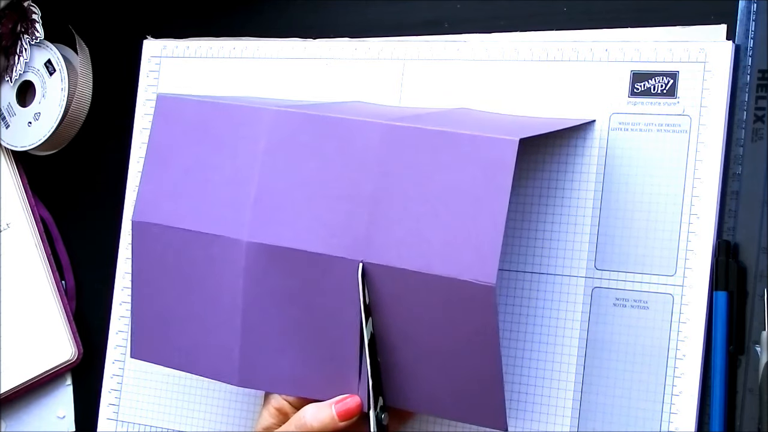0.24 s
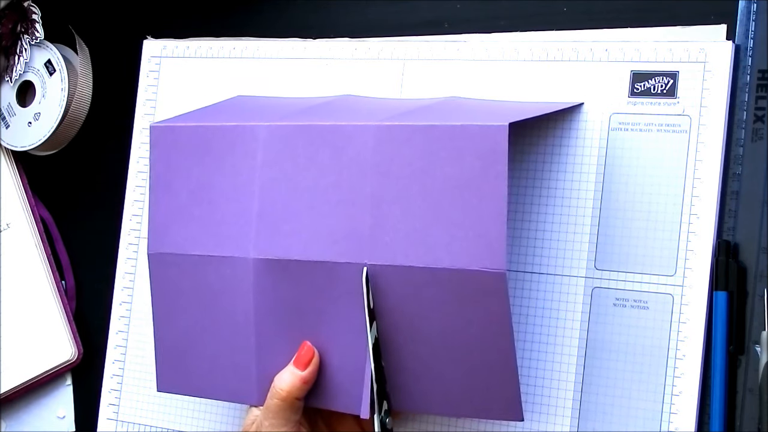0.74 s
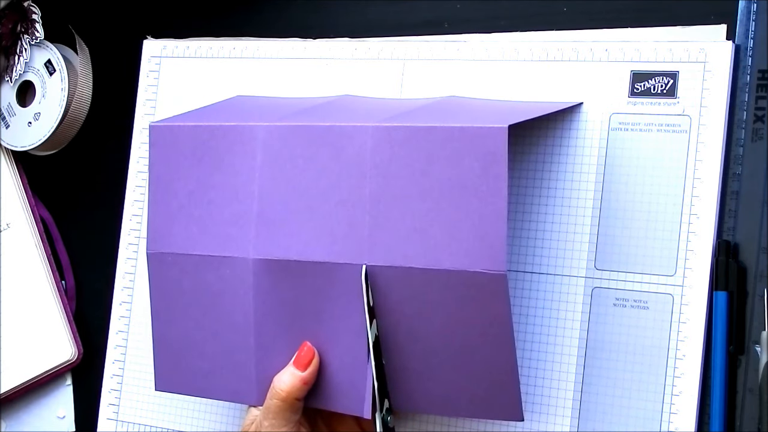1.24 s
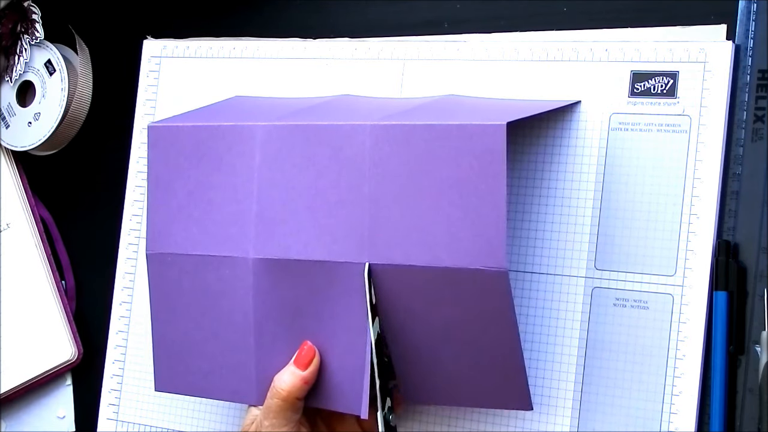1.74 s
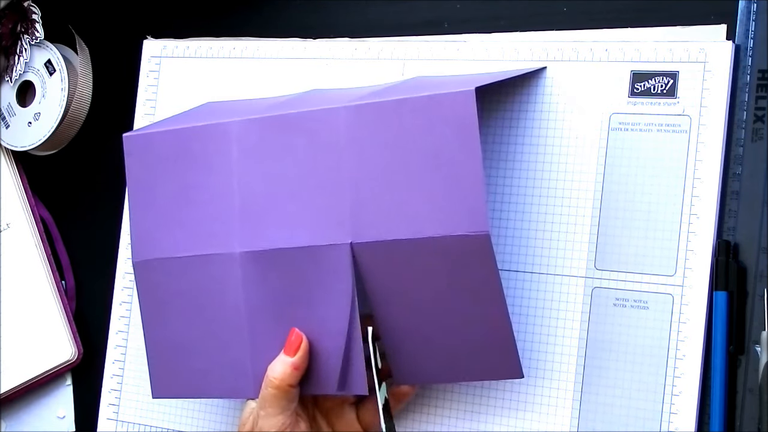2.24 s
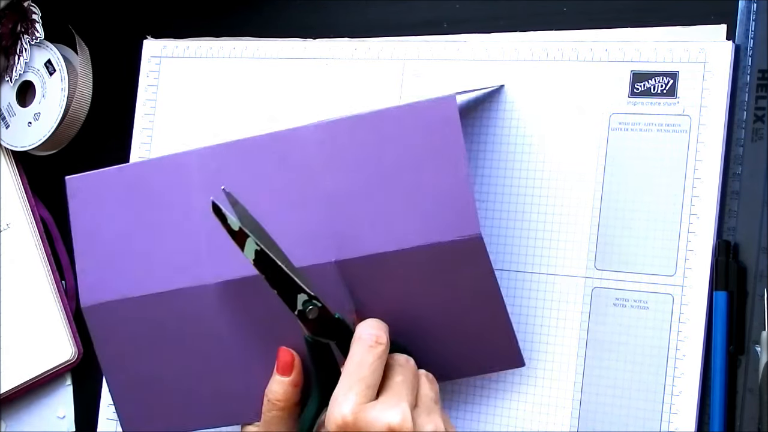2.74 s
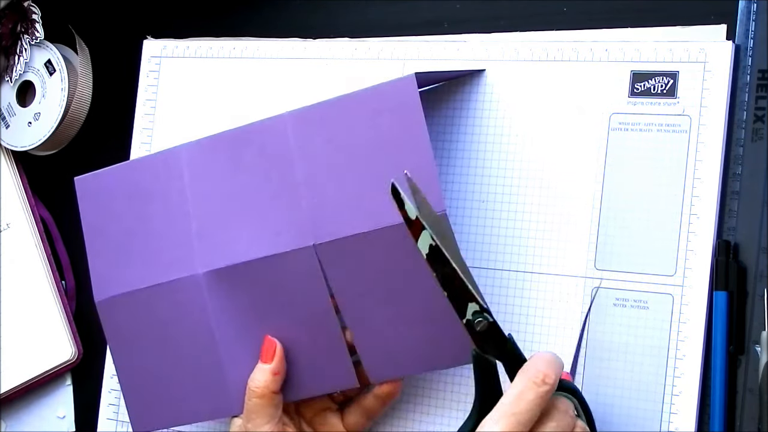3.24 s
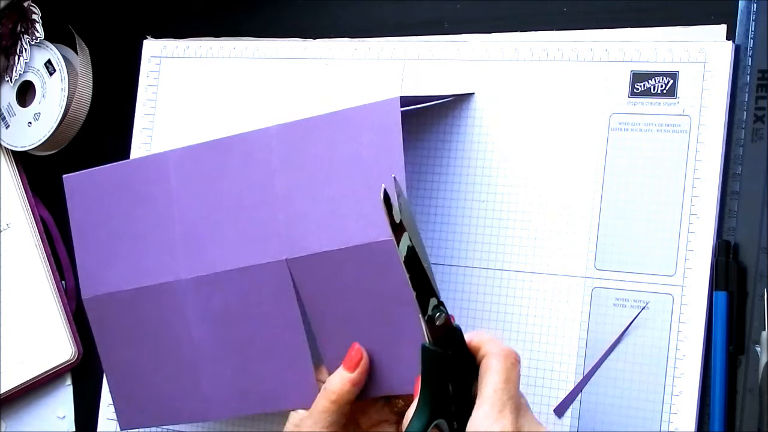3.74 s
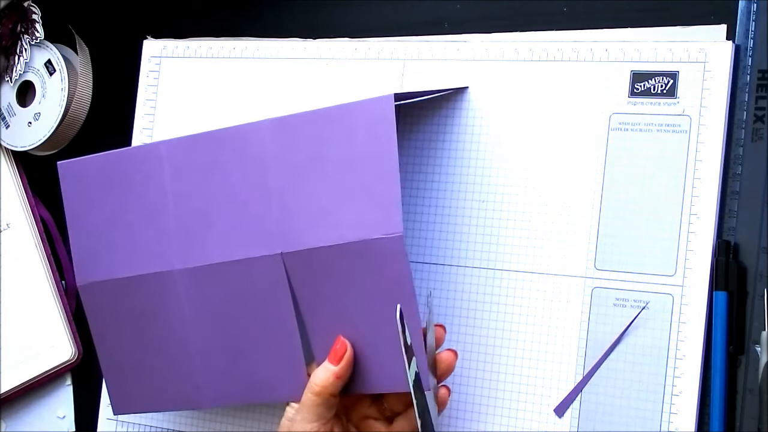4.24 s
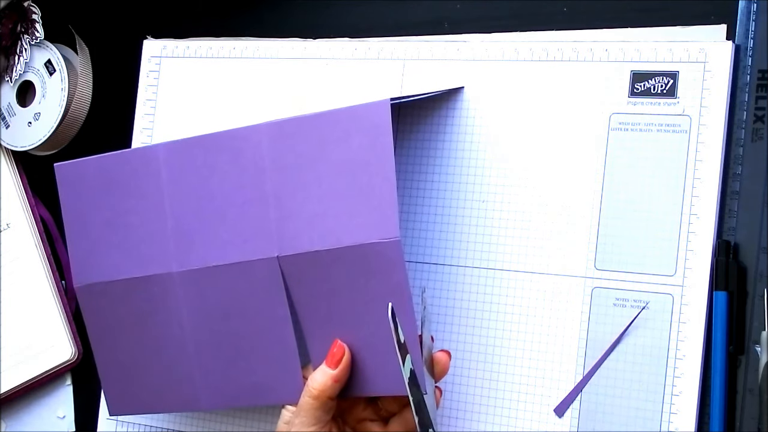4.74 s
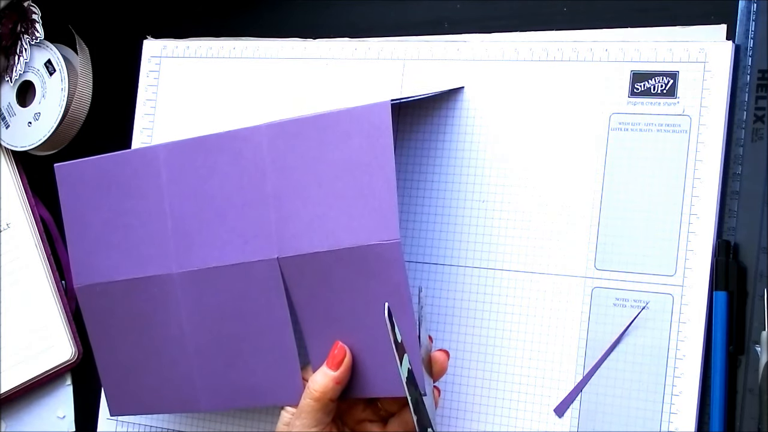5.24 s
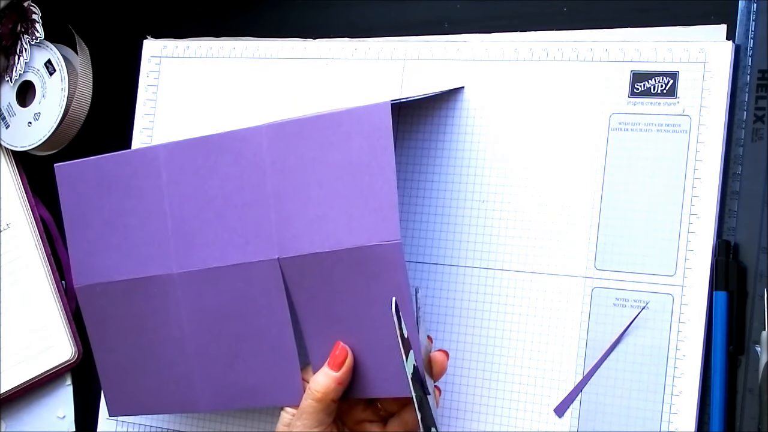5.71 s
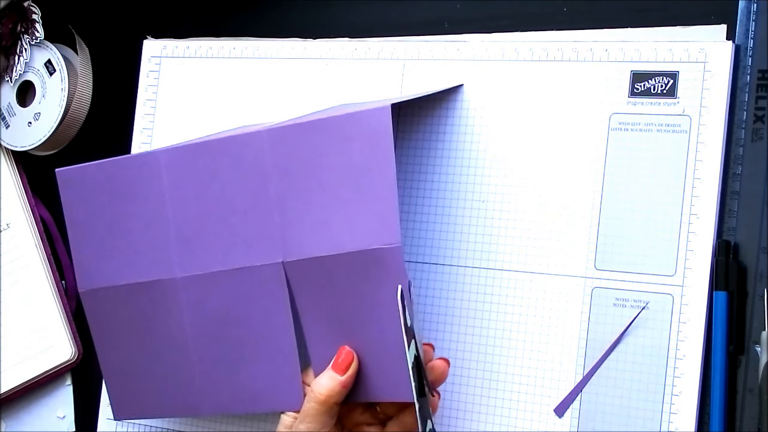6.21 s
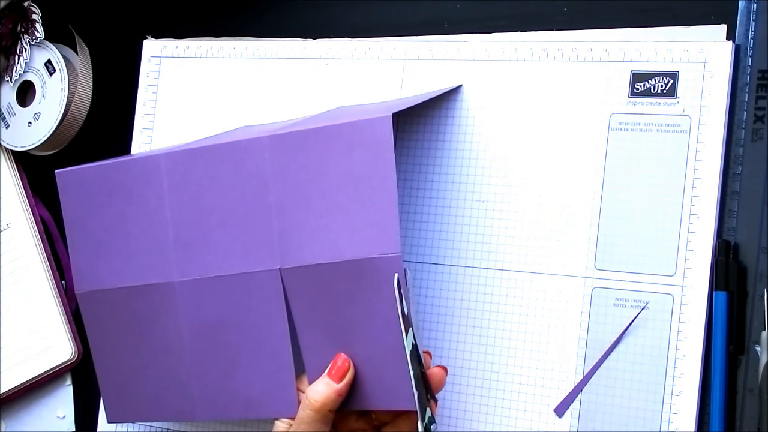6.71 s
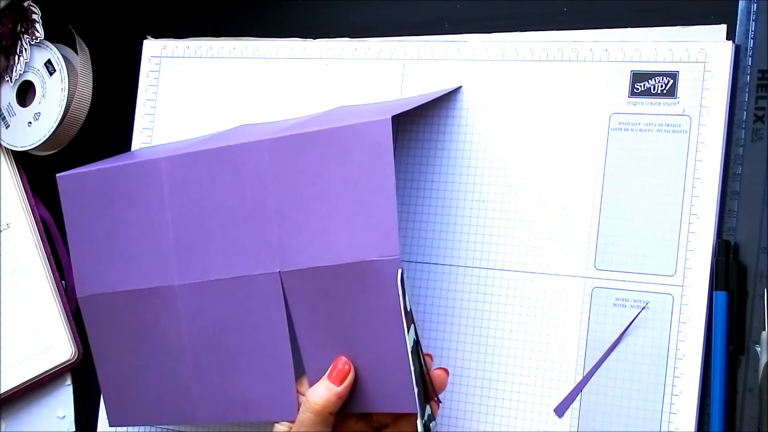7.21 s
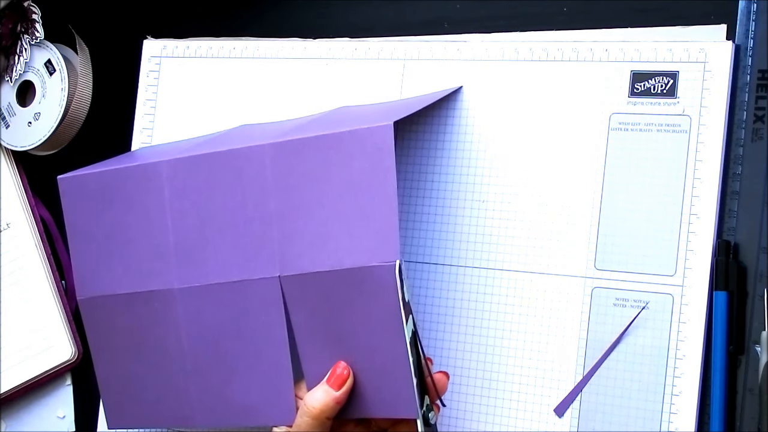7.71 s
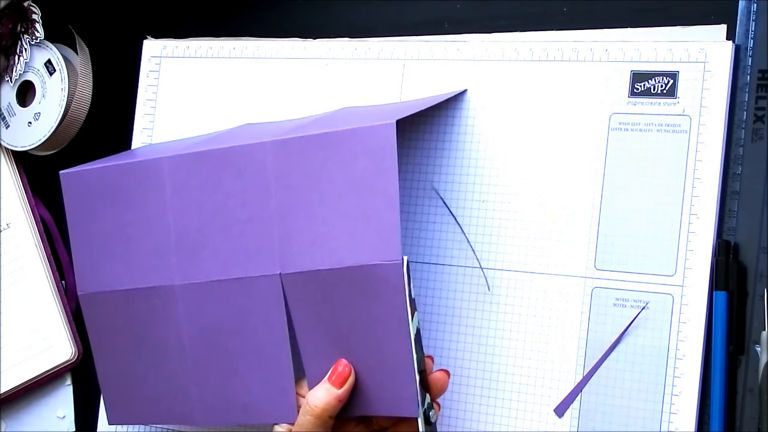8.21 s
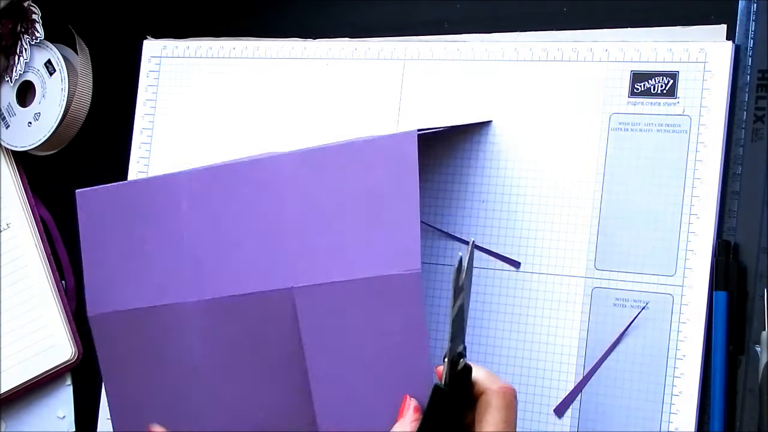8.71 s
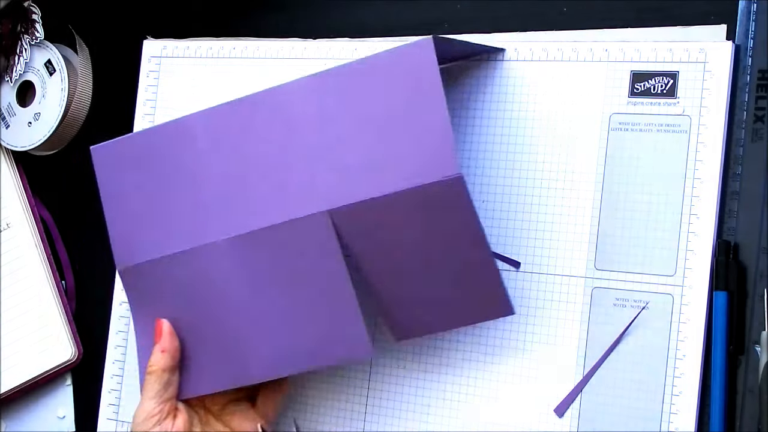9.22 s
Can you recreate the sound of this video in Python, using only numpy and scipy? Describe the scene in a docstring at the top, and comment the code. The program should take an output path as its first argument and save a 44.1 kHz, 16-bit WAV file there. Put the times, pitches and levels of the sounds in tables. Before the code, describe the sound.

Scissors cut a folded sheet of card, close to the microphone in a small quiet room. Soft handling leads into a run of crunchy cuts ending in a sharp snap. The card then scrapes, rustles and clicks as it is moved. After a brief lull come slower, softer cuts, another sharp snap of the blades, and a last stretch of rustling and tapping over faint hiss.

```python
"""Scissors cut a folded sheet of card above a craft table in a small quiet room.
Fibres tear in bursts of crackle, the blade tips snap shut, and the card scrapes by stick-slip.
Each break sounds the cut edge, a loose flap, the steel and the low, booming modes of the sheet.
The room answers with a short tail over faint air noise; a two-port microphone adds its hiss."""
import sys
import numpy as np
from scipy import signal
from scipy.fft import rfft, irfft, next_fast_len
from scipy.io import wavfile
from scipy.ndimage import uniform_filter1d

SR = 44100
rng = np.random.default_rng(int(sys.argv[2]) if len(sys.argv) > 2 else 0)


def pcm_store(signal):
    """Save signal as 16-bit PCM."""
    levels = np.round(np.clip(np.atleast_2d(signal), -1, 1) * 32767)
    wavfile.write(sys.argv[1], SR, levels.astype(np.int16).T)


N = 417186


def undb(db):
    """Gain of a dB value."""
    return 10 ** (np.asarray(db) / 20)


def unit(x):
    """Scale to rms 1."""
    return x / np.sqrt(np.mean(x ** 2))


def colour(x, points):
    """Minimum-phase EQ along a (Hz, dB) curve, with unit power gain."""
    size = 4096
    hz, db = np.transpose(points)
    curve_db = np.interp(np.log(np.arange(size // 2 + 1) * SR / size + 1), np.log(hz), db)
    cepstrum = irfft(curve_db * np.log(10) / 20)
    cepstrum[1:size // 2] *= 2
    cepstrum[size // 2 + 1:] = 0
    impulse = irfft(np.exp(rfft(cepstrum)))[:size // 2]
    return signal.fftconvolve(x, impulse / np.sqrt(np.sum(impulse ** 2)))[:len(x)]


def drift(rate_hz):
    """Random modulator: sample and hold, slewed twice, rms 1."""
    hold = int(SR / rate_hz)
    steps = np.repeat(rng.standard_normal(N // hold + 1), hold)
    return unit(uniform_filter1d(uniform_filter1d(steps, hold), hold)[:N])


def air():
    """Room tone: faint air noise whose level wanders slightly."""
    # air noise spectrum (frequency [Hz], relative level [dB])
    air_eq = [(60, -17), (100, -4.5), (190, -4.5), (290, -3), (480, -2), (570, 0.5), (820, 4.5),
              (1000, -15), (1500, -4), (2800, -10.5), (3600, -10), (5500, -24.5), (9000, -32)]
    return colour(rng.standard_normal(N), air_eq) * undb(-61 + drift(2.5))


def room(x):
    """Small-room reverb: a noise tail that builds over a few ms and fades octave by octave."""
    # room decay (frequency [Hz], time to fall 60 dB [s])
    decay = [(250, 0.17), (700, 0.23), (2000, 0.27), (4000, 0.24), (9000, 0.22)]
    hz, t60 = np.transpose(decay)
    t = np.arange(SR // 2) / SR
    tail = 0
    for centre in 180 * 2 ** np.arange(7):
        octave = [centre / np.sqrt(2), min(centre * np.sqrt(2), .45 * SR)]
        bandpass = signal.butter(2, octave, "band", fs=SR, output="sos")
        band_t60 = np.interp(np.log(centre), np.log(hz), t60)
        tail = tail + signal.sosfilt(bandpass, rng.standard_normal(len(t))) * undb(-60 * t / band_t60)
    tail = tail * (1 - np.exp(-t / 0.0013))
    return signal.fftconvolve(x, tail / np.sqrt(np.sum(tail ** 2)))[:N]


def table_bounce(x):
    """The reflection off the table cancels narrow bands of the sound."""
    # cancelled bands (centre [Hz], width [Hz])
    notches = [(222, 22), (1100, 125)]
    for hz, width in notches:
        x = signal.lfilter(*signal.iirnotch(hz, hz / width, fs=SR), x)
    return x


def ports(x):
    """The two close ports hear one wave with a level and phase offset per frequency."""
    # balance of the ports (frequency [Hz], left minus right [dB])
    balance = [(200, -.6), (2400, -1.1), (4200, 1.0), (6000, .2)]
    # phase between the ports (frequency [Hz], lead of the left [rad])
    lead = [(2600, 0), (3900, .5), (5500, 0), (6600, 2.6), (7700, 0)]
    size = next_fast_len(N)
    hz = np.arange(size // 2 + 1) * SR / size
    left = undb(np.interp(hz, *np.transpose(balance)) / 2)
    left = left * np.exp(.5j * np.interp(hz, *np.transpose(lead)))
    return irfft(rfft(x, size) * np.array([left, 1 / left]), size)[:, :N]


def cutting():
    """Gate: 1 while the blades bite the sheet, else 0."""
    # slow cuts (start [s], end [s])
    cuts = [(1.4, 2.0), (5.67, 7.1), (7.949, 8.7)]
    t = np.arange(N) / SR
    return sum((t > start) & (t < end) for start, end in cuts)


def panel(x, modes, bend_db, held_row, clamp_db):
    """Card resonances: bending shifts their levels; clamping blades lift one and duck the rest."""
    rung = 0
    for row, (hz, width, db) in enumerate(modes):
        held_db = (clamp_db if row == held_row else -clamp_db) * cutting()
        drive = x * undb(db + held_db + bend_db * drift(9))
        resonator = signal.iirpeak(hz, hz / width, fs=SR)
        rung = rung + signal.lfilter(*resonator, drive) * np.sqrt(SR / width / np.pi)
    rung = rung / np.sqrt(np.sum(undb(np.transpose(modes)[2]) ** 2))
    band_hz = [1.027 * modes[0][0], 1.12 * modes[-1][0]]  # the card radiates little outside its modes
    return signal.sosfilt(signal.butter(2, band_hz, "band", fs=SR, output="sos"), rung)


def card(edge, flap, boom, steel, grains):
    """One stream of breaks, under four envelopes, sounds the cut edge, flap, whole sheet and steel."""
    # modes of the loose flap beside the cut (frequency [Hz], width [Hz], relative level [dB])
    flap_modes = [(1309, 160, -5.5), (1507, 137, -9.5), (1698, 119, -6.5), (1976, 240, -5.5),
                  (2372, 377, -1.5)]
    # low modes of the whole sheet (frequency [Hz], width [Hz], relative level [dB])
    sheet_modes = [(300, 60, -6), (410, 70, -8), (555, 55, -5), (665, 44, -2.5), (860, 55, -1),
                   (950, 60, -7)]
    # rasp of the cut edge (frequency [Hz], relative level [dB])
    tear_eq = [(1500, -46.5), (2400, 1.5), (3000, 3), (3650, 6), (4000, 1.5), (4500, -5.5), (5700, -31),
               (7500, -50.5), (12000, -71)]
    # sheen of the blades (frequency [Hz], relative level [dB])
    blade_eq = [(3000, -12.5), (5500, 5), (9000, 0), (12000, -11), (15000, -22)]
    flap_ring = panel(flap * grains, flap_modes, bend_db=3.2, held_row=1, clamp_db=2.)
    sheet_boom = panel(boom * grains, sheet_modes, bend_db=1.8, held_row=3, clamp_db=3.5)
    return colour(edge * grains, tear_eq) + flap_ring + sheet_boom + colour(steel * grains, blade_eq)


def crackle(per_second, spread_db):
    """Fibres break at random moments; spread makes a few much louder than the rest."""
    breaks = (rng.random(N) < per_second / SR) * rng.standard_normal(N)
    return unit(breaks * undb(spread_db * rng.exponential(size=N)))


def slide_envelopes():
    """Card slides on blades, fingers and table: edge, flap and boom each swell, hold and fade."""
    # slides (time at full strength [s], hold [s], swell [s], fade [s], edge level [dB],
    # flap [dB re edge], sheet boom [dB re edge])
    slides = [(0.088, 0.15, 0.12, .2, -54, -2, -8), (0.454, 0.36, 0.25, 0.066, -52, -4, -5.5),
              (0.706, 0.016, 0.2, 0.075, -55, -1, 4.5), (1.833, .01, .15, 0.27, -54, 6, -4),
              (2.097, .25, 0.1, 0.13, -45.5, -4.5, -11.5), (2.644, 0.0093, 0.17, .1, -39.5, -5.5, -16),
              (2.833, .01, .11, 0.25, -38.5, -2, -13), (3.105, .07, .3, .1, -55.5, -4, -8),
              (3.307, .01, .03, 0.21, -40.5, 2.5, -9), (3.612, 0.011, .045, 1, -43.5, -5, -12),
              (3.973, .01, 0.092, 0.12, -41, 5.5, -8), (4.36, 0.013, 0.23, 0.23, -50.5, -7, -10),
              (5.692, .01, .06, .2, -56, -0.5, -5.5), (5.965, .08, 0.39, 0.046, -50, -1, -0.5),
              (6.26, 0.1, 0.089, 0.19, -48.5, -3.5, -10), (6.597, 0.16, 0.9, 0.37, -62.5, -4.5, -7),
              (6.88, 0.19, .2, .2, -59, -0.5, -4), (7.286, 0.025, 0.29, 0.8, -51, -2.5, -6.5),
              (7.655, .01, 0.098, 0.5, -57.5, -1.5, -9), (8.118, .01, 0.27, 0.15, -48.5, -11, -4),
              (8.38, 0.063, 0.22, 0.18, -56.5, -2, -10), (8.593, .01, 0.13, 0.18, -37, -3.5, -12),
              (8.8, 0.016, 0.12, 0.33, -43, -5, -14), (8.97, 0.0086, 0.087, 0.23, -40.5, -1, -2),
              (9.18, 0.065, 0.27, 0.31, -42, -4.5, -8)]
    ramp_db, hum_db = 24.5, -67  # change over one swell or fade time; hum of the sheet in the hand
    t = np.arange(N) / SR
    power = np.zeros((3, N))
    power[2] = undb(hum_db) ** 2
    for time, hold, swell, fade, edge_db, flap_db, boom_db in slides:
        ramps_away = np.clip(np.maximum((time - t) / swell, (t - time - hold) / fade), 0, 10)
        power += undb(edge_db - ramp_db * ramps_away + np.array([[0], [flap_db], [boom_db]])) ** 2
    return np.sqrt(power)


def scrape():
    """Dense stick-slip of card; the grip catches and lets go tens of times a second."""
    edge, flap, boom = slide_envelopes()
    # a biting blade jerks more than a sliding sheet
    grip_db = (1.3 + 1.5 * cutting()) * drift(60) + 1.2 * drift(90)
    edge, flap, boom = edge * undb(grip_db), flap * undb(grip_db), boom * undb(0.64 * grip_db)
    return card(edge, flap, boom, edge * undb(-22), crackle(12000, spread_db=0.0))


def snaps():
    """Scissor snaps as bursts of crackle: the harder, the sharper the attack and the less flap."""
    # snips, snaps and taps (time [s], edge level [dB], sheet boom [dB re edge], blade [dB re edge],
    # time to fall 60 dB [ms])
    hits = [(0.413, -47.5, -7, -18, 150), (0.615, -44, -7, -22, 22), (0.642, -40, -5, -28, 50),
            (0.648, -31, -5.5, -27, 53), (0.876, -55, -8, -28, 160), (0.948, -57, -2, -26, 80),
            (1.013, -56.5, 0.5, -28, 73), (1.154, -49.5, -1.5, -33, 72), (1.249, -58.5, 4.5, -28, 115),
            (1.427, -45.5, -17, -27, 160), (1.485, -38, -12, -26, 77), (1.592, -42.5, -15, -29, 58),
            (1.696, -35, -18, -28, 77), (1.731, -40.5, -12, -26, 62), (1.758, -47, -21, -21, 110),
            (1.788, -38.5, -6, -20, 160), (1.873, -18.5, -0.5, -11, 48), (2.119, -37.5, -21, -25, 91),
            (2.28, -56, 11.5, -18, 74), (2.618, -22, -16.5, -26.5, 107), (2.643, -33.5, -5, -48, 256),
            (2.782, -31.5, -5.5, -25.5, 105), (2.873, -30, -11, -43, 69), (2.926, -44, -6, -32, 69),
            (2.949, -33.5, -17.5, -19, 50), (3.24, -27, -18.5, -55, 96), (3.278, -20, -23, -56, 97),
            (3.443, -40.5, -24, -23, 56), (3.552, -42.5, -17, -33, 60), (3.575, -38.5, -12, -33, 200),
            (3.89, -31, 1.5, -21.5, 53), (3.94, -15.5, -18.5, -50, 49), (4.104, -47.5, 1, -24, 95),
            (4.244, -45, -4, -24, 110), (5.737, -48, 2, -18, 33), (5.904, -43, -16, -19, 73),
            (6.038, -44.5, 1, -22, 64), (6.068, -39.5, -4, -25, 57), (6.759, -55.5, 4.5, -16, 70),
            (6.825, -50.5, -3.5, -19, 710), (6.935, -49, -15, -22, 50), (6.956, -42, -7, -26, 47),
            (7.012, -37.5, -10, -23.5, 51), (7.04, -50, -8, -17, 98), (7.112, -32, -8, -19, 50),
            (7.77, -45, 1, -32, 47), (8.008, -47.5, -6, -28, 69), (8.029, -33.5, -6, -24, 45),
            (8.074, -35.5, -7, -25, 60), (8.083, -18.5, -16.5, -11, 63), (8.29, -57.5, -10, -20, 80),
            (8.344, -40, -6.5, -25, 105), (8.386, -43.5, -3, -8.5, 83), (8.52, -30.5, -23, -21.5, 70),
            (8.562, -38, -20, -24, 60), (8.922, -39.5, 4, -22, 180), (9.16, -14, -19.5, -60.5, 40),
            (9.309, -57, 4, 0.5, 99), (9.403, -47, -15, -32, 51), (9.449, -42, -7, -31, 84)]
    soft_db, soft_attack_ms, attack_halving_db = -46, 5.4, 9
    envelopes = np.zeros((4, N))
    for time, edge_db, boom_db, blade_db, t60_ms in hits:
        start = int(time * SR)
        ms = np.arange(min(SR // 4, N - start)) * 1000 / SR
        hardness_db = edge_db - soft_db
        attack_ms = soft_attack_ms * .5 ** (hardness_db / attack_halving_db)
        flap_db = 1 - 0.1754 * hardness_db
        shape = (1 - np.exp(-ms / attack_ms)) * undb(-60 * ms / t60_ms)
        gains = undb(edge_db + np.array([[0], [flap_db], [boom_db], [blade_db]]))
        envelopes[:, start:start + len(ms)] += shape / shape.max() * gains
    return card(*envelopes, crackle(8000, spread_db=2.0))


def scene():
    """Scissors and card up close, with room tail and air, mixed mid/side to stereo."""
    close = snaps() + scrape()
    air_mid, air_side = air(), air()
    mid = table_bounce(close + undb(-10) * room(close) + air_mid)
    wide = room(close)
    treble = signal.sosfilt(signal.butter(2, 5500, "high", fs=SR, output="sos"), wide)
    wide = wide + undb(11.5) * treble  # the ports differ more for short waves
    side = undb(-22.5) * wide + undb(-4.5) * air_side
    return ports(mid) + side * np.array([[1], [-1]])


def record(dry):
    """The capsule drops the bass, each channel adds its own hiss, the top is cut steeply."""
    # microphone hiss (frequency [Hz], relative level [dB])
    hiss_eq = [(60, -60), (300, -22), (1500, -12), (5000, 0), (10000, -1), (15000, -6)]
    low_cut_hz, top_hz, hiss_db = 294, 15600, -67.5
    hiss = np.array([colour(rng.standard_normal(N), hiss_eq) for _ in range(2)]) * undb(hiss_db)
    thin = signal.sosfilt(signal.butter(2, low_cut_hz, "high", fs=SR, output="sos"), dry)
    return signal.sosfilt(signal.ellip(10, .2, 60, top_hz, fs=SR, output="sos"), thin + hiss)


dry = scene()
out = record(dry)
pcm_store(out)
```